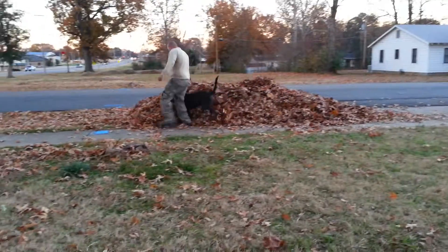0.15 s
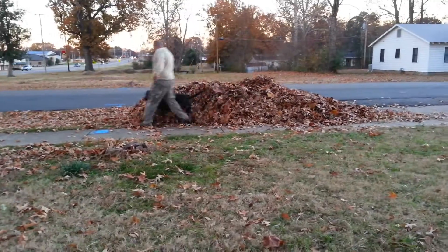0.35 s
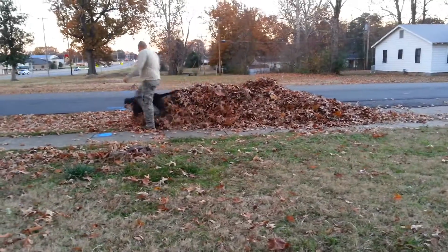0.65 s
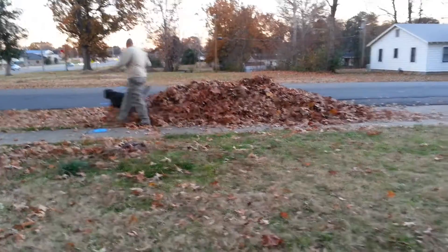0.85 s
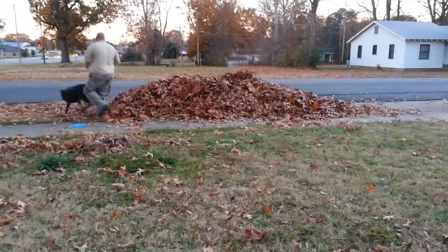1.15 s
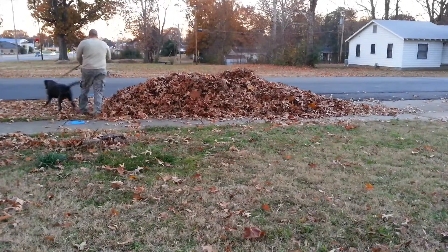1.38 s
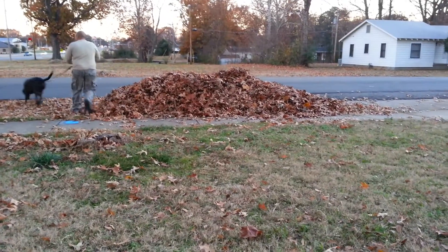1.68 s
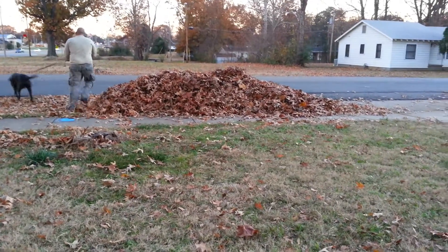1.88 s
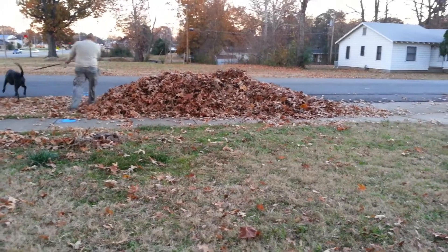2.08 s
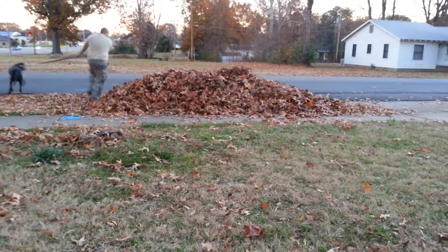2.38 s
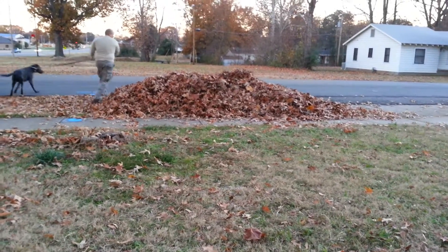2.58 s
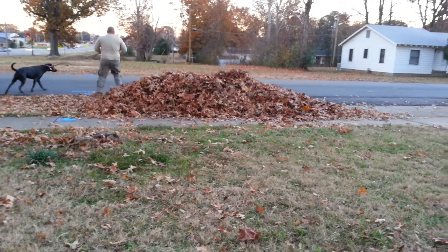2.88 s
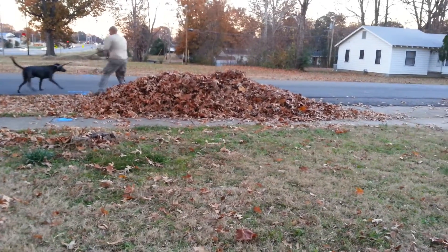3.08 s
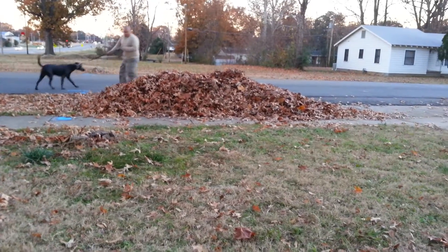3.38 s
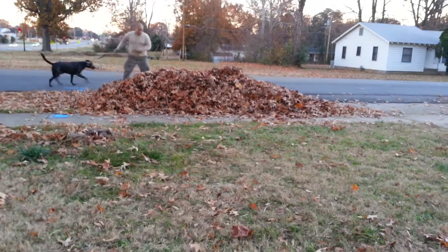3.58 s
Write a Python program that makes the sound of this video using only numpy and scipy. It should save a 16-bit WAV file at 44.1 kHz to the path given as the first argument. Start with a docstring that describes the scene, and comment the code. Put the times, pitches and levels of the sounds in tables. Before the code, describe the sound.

Loud, bright crunching of dry leaves as a dog and person wade out of a pile, thinning to sparse rustles and snaps; collar tags clink late, over a faint traffic hush and distant idling engine outdoors.

```python
"""A dog and a person wade out of dry leaves by a street: clumped crackle, later thinning, plus snaps.
From the start: traffic hush (patchy noise) and a far idling engine (harmonics that swell and dip).
The right microphone port rings near 7 kHz; a finger muffles the left, which opens slightly at 1.48 s.
From 1.55 s the dog's collar tags clink (gritty ticks, ringing modes), most densely after 3.3 s.
Dull finger knocks (damped swings) hit the left port around 1.7 s and once at 3.05 s."""
import sys
import numpy as np
from scipy import signal
from scipy.io import wavfile
from scipy.ndimage import uniform_filter1d

SR = 44100
rng = np.random.default_rng(int(sys.argv[2]) if len(sys.argv) > 2 else 0)


def persist_wave(psi):
    """Save psi, clipped to +-1, as 16-bit WAV."""
    counts = np.round(np.clip(psi, -1, 1) * 32767).astype(np.int16)
    wavfile.write(sys.argv[1], SR, np.atleast_2d(counts).T)


N = 164934

# leaf stirring: time_s, relative_level_db
LEAF_STIRRING = [(0.0, -28.5), (0.02, -24.5), (0.24, -29), (0.29, -18), (0.33, -25), (0.35, -19.5),
                 (0.43, -18.5), (0.48, -27.5), (0.52, -29), (0.58, -26.5), (0.59, -28.5), (0.66, -25),
                 (0.92, -28.5), (1.1, -34.5), (1.16, -31), (1.25, -35.5), (1.4, -36.5), (1.5, -30),
                 (1.54, -37), (1.55, -35), (1.57, -37), (1.62, -42), (1.64, -37.5), (1.67, -42.5),
                 (1.68, -35.5), (1.74, -37.5), (1.82, -32.5), (2.04, -43), (2.12, -36), (2.21, -44),
                 (2.26, -36.5), (2.28, -41.5), (2.32, -40), (2.4, -53.5), (2.5, -54.5), (2.51, -38),
                 (2.52, -48), (2.57, -35), (2.59, -36), (2.69, -45), (2.7, -36.5), (2.72, -47.5),
                 (2.79, -36.5), (2.92, -55), (3.0, -47), (3.01, -54.5), (3.19, -41.5), (3.34, -55.5)]
# leaf spectrum at the ringing right port: freq_hz, relative_density_db
LEAF_RIGHT = [(300, -29), (550, -30), (800, -12.5), (1500, -11), (2300, -9.5), (3000, -7), (4000, -6.5),
              (5000, -1.5), (5500, 0), (6100, 6), (6450, 7), (6900, 12), (7400, 7), (8200, -0.9),
              (9200, -5.5), (12000, -9), (14300, -19)]
# leaf spectrum at the muffled left port, same reference: freq_hz, relative_density_db
LEAF_LEFT_PORT = [(300, -49), (600, -20.5), (900, -14.5), (1500, -21), (2500, -13.5), (3200, -14),
                  (4500, -13), (6000, -14), (7000, -19), (7900, -26), (9300, -30), (10200, -23.5),
                  (11000, -33), (11900, -27), (14300, -30)]
# dull part of the crunch against the bright: time_s, relative_level_db
LEAF_BODY = [(0, 1.5), (.3, -0.5), (.45, 1), (1.1, .5), (1.6, -4.5), (2.2, -8), (3.3, 3)]
CRACKS_PER_S, CRACK_SPREAD_DB, HUSH_POWER_SHARE = 2500, 2, 0.51
CLUMP_DB, CLUMP_S, LEAF_DB = 1, 0.0087, 6.5
BODY_HZ, FIZZ_HZ = 3040, 9000  # band splits
FIZZ_FLATTENING, FIZZ_PIVOT_DB = 0.1, -31.5  # fizz follows the stirring less
LEAF_LIKENESS, LEAF_LEFT_LAG_S, LEAF_APART_HZ = 0.3, 0.00019, 4870

# distant traffic: freq_hz, relative_density_db
ROAD_SPECTRUM = [(18, -37), (30, -33.5), (102, -3.5), (211, -10), (448, -24), (735, -15.5), (815, -15.5),
                 (1870, -18.5), (3320, -34.5), (4900, -30), (5300, -36), (13900, -57), (15000, -61)]
# traffic balance: freq_hz, left_minus_right_db
ROAD_BALANCE = [(60, -6), (120, -1.5), (240, 1.5), (480, -1.5), (950, -6), (1890, -9.5), (3770, -11),
                (7520, -8), (15000, 8)]
# traffic left-right correlation: freq_hz, likeness (0 to 1)
ROAD_LIKENESS = [(60, 0.86), (200, 0.77), (550, 0.41), (1600, 0.63), (5000, 0.59), (15000, .1)]
# traffic swell: time_s, relative_level_db
ROAD_LOUDNESS = [(0, -1), (1.1, -1.5), (2, 1), (2.9, -0.1), (3.74, 3)]
ROAD_DB, ROAD_LEFT_LAG_S, PATCH_DB = -40.5, 0.00035, 1.2

# harmonics of the idling speed: multiple, relative_level_db
ENGINE_ORDERS = [(1, -53), (2, -13), (3, 0.5), (4, -5), (5, -11.5), (6, -10.5), (7, -14), (8, -11.5),
                 (9, -20.5), (10, -33.5)]
# engine loudness: time_s, firing_order_db, other_orders_db
ENGINE_LOUDNESS = [(0.0, -44.5, -43.5), (0.13, -39, -40.5), (0.32, -39.5, -41), (0.46, -61, -45.5),
                   (0.51, -41, -39.5), (0.68, -41, -40.5), (0.78, -51, -40), (1.0, -35, -36.5),
                   (1.61, -40, -42), (1.69, -40.5, -37.5), (2.44, -35, -40.5), (2.58, -33.5, -37.5),
                   (2.76, -42, -37.5), (3.07, -33.5, -39), (3.7, -39.5, -34.5), (3.74, -29.5, -32)]
ENGINE_HZ, FIRING_ORDER, SPEED_DRIFT = 30.2, 3, 0.0031
WAVER_DB, WAVER_TOP_HZ, ENGINE_LEFT_LAG_S = 3.5, 5, 0.00033

# single leaves or twigs snapping: start_s, level_db, pitch_hz
LEAF_SNAPS = [(0.2745, -8.5, 6800), (0.6624, -11, 6900), (1.493, -19, 6400), (1.636, -17.5, 6750),
              (1.682, -26, 6800), (1.7127, -17, 6500), (2.1228, -21, 4470), (2.253, -21.5, 6500),
              (2.331, -17.5, 6650), (2.508, -30, 5140), (2.647, -26.5, 4500), (2.756, -22, 7000)]
SNAP_HALF_RISE_S, SNAP_GRIT = 0.00029, 0.8

# collar tags touching: start_s, tick_level_db, tick_pitch_hz, ring_drive_db, chatter_s, struck_mode_hz
TAG_CLINKS = [(1.551, -13.5, 6940, -30, .003, 11670), (1.556, -15.5, 8100, -30, .003, 8900),
              (2.663, -20, 6560, -38, .006, 6630), (2.694, -23.5, 7900, -45, .008, 10130),
              (3.354, -34, 6500, -49, .004, 6630), (3.373, -40, 11900, -31, 0.011, 11670),
              (3.378, -25, 6600, -32, .004, 10130), (3.392, -11.5, 6890, -24, .018, 7760),
              (3.402, -22, 7700, -31, .012, 11670), (3.515, -33, 7500, -44.5, .003, 8900),
              (3.555, -30, 6450, -38, .006, 6630), (3.621, -29, 6650, -46, .004, 6630),
              (3.6313, -15.5, 7100, -31, 0.0034, 6630), (3.634, -21, 8400, -31, 0.0056, 10980),
              (3.645, -29, 9350, -36, .01, 11670)]
# ringing modes of the tags: freq_hz, t60_s
TAG_MODES = [(6630, .02), (7760, .04), (8900, .012), (10130, .015), (10980, .015), (11670, .03)]
CLINK_HALF_RISE_S, CLINK_GRIT, OTHER_MODES_DB, SCRAPE_DB = 0.00056, 0.57, -4.5, 8.5

# finger knocks on the left port: start_s, level_before_fade_db, rise_s
FINGER_KNOCKS = [(1.6848, -19, 0.00028), (1.7105, -18, 0.000087), (1.7338, -19, 0.00026),
                 (1.735, -7.5, 0.0005), (1.7429, -8.5, 0.0001), (1.774, -17, 0.00012), (3.046, -20, .002)]
KNOCK_HZ, KNOCK_FADE_S = 326, 0.0013

UNCOVER_START_S, UNCOVER_LEN_S, UNCOVER_DB, UNCOVER_ABOVE_HZ = 1.48, 0.066, 2.5, 300
LIMIT_DB, SQUEEZE_DB_PER_DB, HOLD_FALL_DB_PER_S = -22, 0.19, 31
BASS_CUT_HZ, EDGE_HZ = 38.7, 14500


def amp(db):
    """Amplitude ratio from dB."""
    return 10 ** (np.asarray(db) / 20)


def evened(x):
    """Scale to rms 1."""
    return x / np.sqrt(np.mean(x ** 2) + 1e-20)


def read(points, hz):
    """Interpolate a spectrum table on a log frequency axis."""
    f, value = np.transpose(points)
    return np.interp(np.log(hz + 1), np.log(f + 1), value)


def curve(points):
    """Interpolate a time table to every sample."""
    s, value = np.transpose(points)
    return np.interp(np.arange(N) / SR, s, value)


def filtered(x, order, hz, kind):
    """Butterworth filter."""
    return signal.sosfilt(signal.butter(order, hz, kind, fs=SR, output="sos"), x)


def add(mix, s, sound):
    """Mix a sound in place at s seconds."""
    part = mix[round(s * SR):][:len(sound)]
    part += sound[:len(part)]


def slow_wander(top_hz):
    """Random slow wander of rms 1: sines over a decade up to top_hz, weaker with frequency."""
    t = np.arange(N) / SR
    rates_hz = np.geomspace(top_hz / 10, top_hz, num=12)
    return evened(sum(np.sin(2 * np.pi * (f * t + rng.random())) / np.sqrt(f) for f in rates_hz))


def causal(points):
    """Minimum-phase impulse response with the table's spectrum."""
    hz = np.abs(np.fft.fftfreq(4096, 1 / SR))
    log_gain = np.log(amp(read(points, hz)))
    return np.fft.ifft(np.exp(np.conj(signal.hilbert(log_gain)))).real[:2048]


def ports(x, other):
    """Right port rings; the left is muffled, late and only partly alike."""
    right, left = causal(LEAF_RIGHT), causal(LEAF_LEFT_PORT)
    partly_alike = LEAF_LIKENESS * x + np.sqrt(1 - LEAF_LIKENESS ** 2) * other
    late = np.roll(partly_alike, round(LEAF_LEFT_LAG_S * SR))
    heard = [signal.oaconvolve(late, left)[:N], signal.oaconvolve(x, right)[:N]]
    return np.array(heard) / np.linalg.norm(right)


def crackle():
    """Random clicks of uneven size over the hush of countless faint ones."""
    size_db = CRACK_SPREAD_DB * np.minimum(rng.exponential(1, N), 5)
    size = amp(size_db) * np.sign(rng.standard_normal(N))
    cracks = size * (rng.random(N) < CRACKS_PER_S / SR)
    hush = rng.standard_normal(N)
    return np.sqrt(1 - HUSH_POWER_SHARE) * evened(cracks) + np.sqrt(HUSH_POWER_SHARE) * hush


def leaves():
    """Crackle clumps under the stirring; dull, bright and fizzy cracks come from different leaves."""
    def clumps():
        return evened(uniform_filter1d(rng.standard_normal(N), round(CLUMP_S * SR)))

    def side():
        low = filtered(crackle(), 2, BODY_HZ, "low")
        mid = filtered(crackle(), 2, [BODY_HZ, FIZZ_HZ], "band")
        top = filtered(crackle(), 2, FIZZ_HZ, "high")
        return dull * low + bright * mid + fizz * top

    shared, own, fine = clumps(), clumps(), clumps()
    stir_db = curve(LEAF_STIRRING)
    bright = amp(stir_db + LEAF_DB) * evened(amp(CLUMP_DB * shared))
    dull = bright * amp(curve(LEAF_BODY) + 0.99 * (own - shared))
    fizz = bright * amp(FIZZ_FLATTENING * (FIZZ_PIVOT_DB - stir_db) + 0.91 * (fine - shared))
    return ports(side(), filtered(side(), 1, LEAF_APART_HZ, "high"))


def road():
    """Distant traffic and air: noise, patchy in time and frequency, partly alike at both ports."""
    frames, hz = N // 256 + 5, np.fft.rfftfreq(1024, 1 / SR)
    a, b, c, d, patches = rng.standard_normal((frames, 513, 5)).T
    patches = evened(uniform_filter1d(uniform_filter1d(patches, 12, 0), 14, 1))
    same = np.clip(read(ROAD_LIKENESS, hz), -1, 1)[:, None]
    right, other = a + 1j * b, c + 1j * d
    lag = np.exp(-2j * np.pi * hz * ROAD_LEFT_LAG_S)[:, None]
    left = same * right * lag + np.sqrt(1 - same ** 2) * other
    z = np.array([left * amp(read(ROAD_BALANCE, hz))[:, None], right])
    z *= amp(read(ROAD_SPECTRUM, hz)[:, None] + PATCH_DB * patches)
    noise = signal.istft(z, nperseg=1024, noverlap=768)[1][:, :N]
    return amp(ROAD_DB + curve(ROAD_LOUDNESS)) * evened(noise)


def engine():
    """Orders of a drifting idle; the firing order swells and dips on its own curve, others also waver."""
    turns = np.cumsum(ENGINE_HZ * (1 + SPEED_DRIFT * slow_wander(2.2))) / SR
    others = np.zeros(N)
    for k, db in ENGINE_ORDERS:
        if k != FIRING_ORDER:
            level = amp(db + WAVER_DB * slow_wander(WAVER_TOP_HZ))
            others += level * np.cos(2 * np.pi * (k * turns + 0.46 * rng.random()))
    firing = np.cos(2 * np.pi * FIRING_ORDER * turns)
    rows = np.array(ENGINE_LOUDNESS)
    hum = amp(curve(rows[:, :2])) * evened(firing) + amp(curve(rows[:, ::2])) * evened(others)
    return np.array([amp(0.05) * np.roll(hum, round(ENGINE_LEFT_LAG_S * SR)), hum])


def tick(mix, s, db, hz, half_rise_s, grit):
    """A few gritty cycles with a soft start, weaker at the left port."""
    t = np.arange(300) / SR
    noise = filtered(rng.standard_normal(len(t)), 2, [0.85 * hz, min(1.46 * hz, 0.4 * SR)], "band")
    wave = np.sin(2 * np.pi * hz * t) + grit * noise
    rise = t / half_rise_s / 2
    sound = amp(db) * (rise * np.exp(1 - rise)) ** 2 * wave
    left_db = read(LEAF_LEFT_PORT, hz) - read(LEAF_RIGHT, hz)
    return mix + np.outer(amp([left_db, 0]), np.pad(sound, (round(s * SR), N))[:N])


def snaps():
    """Single breaks that stand out of the rustle."""
    out = np.zeros((2, N))
    for s, db, hz in LEAF_SNAPS:
        out = tick(out, s, db, hz, SNAP_HALF_RISE_S, SNAP_GRIT)
    return out


def tags():
    """Each touch ticks, then chatter excites the modes and a scrape; the struck mode is driven hardest."""
    out, ring, t = np.zeros((2, N)), np.zeros(N), np.arange(4000) / SR
    for s, db, hz, ring_db, chatter_s, struck_hz in TAG_CLINKS:
        out = tick(out, s, db, hz, CLINK_HALF_RISE_S, CLINK_GRIT)
        chatter = rng.standard_normal(len(t)) ** 3 * np.exp(-t / chatter_s)
        nearest_hz = min(TAG_MODES, key=lambda mode: abs(mode[0] - struck_hz))[0]
        response = np.zeros(len(t))
        for f, t60 in TAG_MODES:
            decay = amp(OTHER_MODES_DB * (f != nearest_hz) - 60 * t / t60)
            response += decay * np.sin(2 * np.pi * f * t)
        response[:3] += amp(SCRAPE_DB) * np.array([1, -2, 1])  # passes the chatter itself, treble-heavy
        add(ring, s, amp(ring_db) * signal.fftconvolve(chatter / np.linalg.norm(chatter), response))
    return out + ring * amp([[-24], [0]])  # left, right dB


def knocks():
    """Each knock sucks the left membrane in sharply, then it swings back, strongly damped."""
    out, t = np.zeros((2, N)), np.arange(600) / SR
    for s, db, rise_s in FINGER_KNOCKS:
        swing = np.cos(2 * np.pi * KNOCK_HZ * t) * np.exp(-t / KNOCK_FADE_S)
        add(out[0], s, -amp(db) * np.minimum(t / rise_s, 1) * swing)
    return out


def uncover(air):
    """The left port opens a little above the bass, which passes the finger either way."""
    covered = 1 - np.clip((np.arange(N) / SR - UNCOVER_START_S) / UNCOVER_LEN_S, 0, 1)
    upper = filtered(air[0], 1, UNCOVER_ABOVE_HZ, "high")
    air[0] += upper * (amp(-UNCOVER_DB * covered) - 1)
    return air


def scene():
    """Leaves, traffic and tags pass the finger's opening; the engine and the knocks bypass it."""
    air = leaves() + road() + snaps() + tags()
    return uncover(air) + engine() + knocks()


def record(dry):
    """Gain control eases down under loud sound and recovers slowly; then the band limits."""
    power_db = 10 * np.log10(abs(uniform_filter1d((dry ** 2).mean(0), 900)) + 1e-12)
    fall_db = np.arange(N) * HOLD_FALL_DB_PER_S / SR
    held_db = np.maximum.accumulate(power_db + fall_db) - fall_db
    over_db = np.maximum(held_db - LIMIT_DB, 0)
    ducked = dry / amp(SQUEEZE_DB_PER_DB * uniform_filter1d(over_db, 400))
    ducked = filtered(ducked, 2, BASS_CUT_HZ, "high")
    low_pass = signal.firwin(511, EDGE_HZ, window=("kaiser", 9), fs=SR)
    return signal.oaconvolve(ducked, low_pass[None], "same")


dry = scene()
out = record(dry)
persist_wave(out)
```